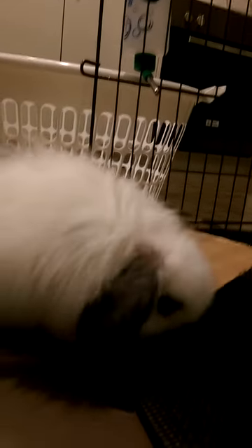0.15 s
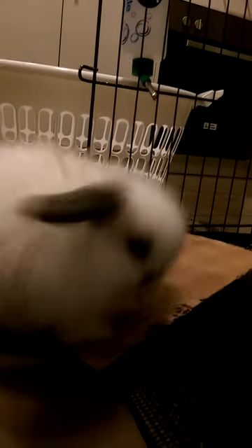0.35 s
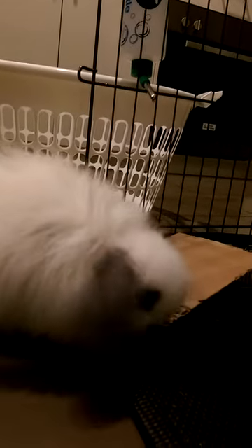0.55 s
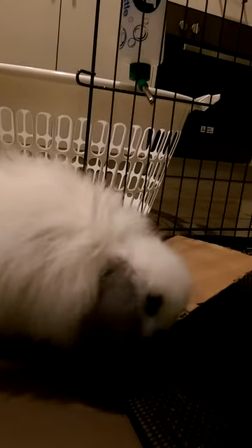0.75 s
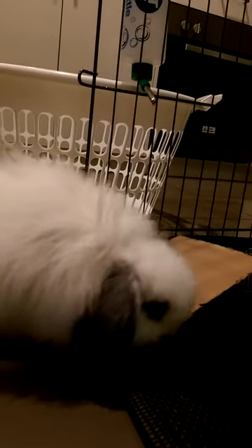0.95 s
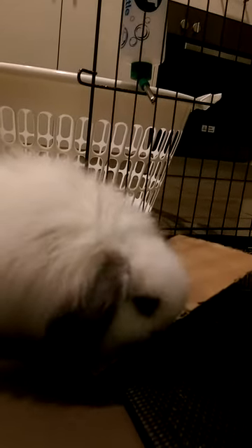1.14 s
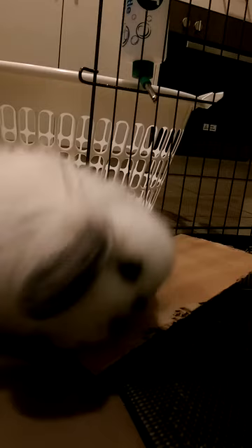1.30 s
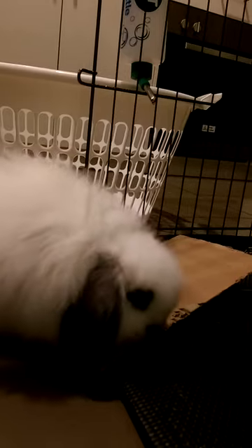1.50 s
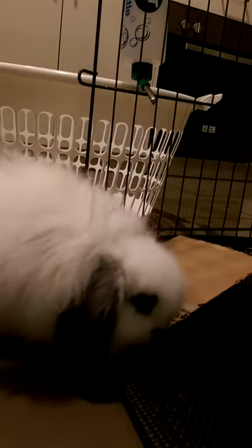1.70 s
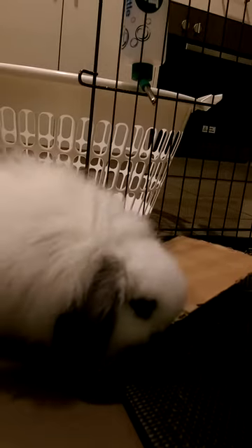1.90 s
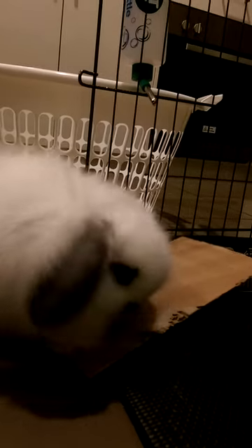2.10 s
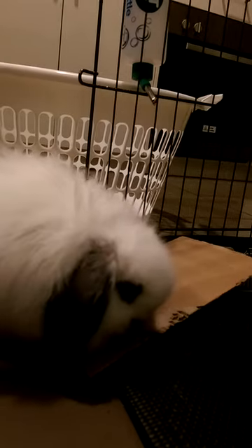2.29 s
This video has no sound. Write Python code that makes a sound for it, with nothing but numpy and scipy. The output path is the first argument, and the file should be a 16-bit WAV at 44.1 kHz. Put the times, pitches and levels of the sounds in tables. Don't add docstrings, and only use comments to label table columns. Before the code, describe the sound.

A rabbit bites cardboard close to a stereo microphone: faint fibre ticks, a sharp crack, a quiet gap, the hardest crunch, another pause, then a softer tearing bite; small hard room, barely audible fan hum.

```python
import sys
import numpy as np
from scipy import signal
from scipy.fft import rfft, irfft
from scipy.io import wavfile

SR = 44100
rng = np.random.default_rng(int(sys.argv[2]) if len(sys.argv) > 2 else 0)


def put_to_file(sound):
    columns = np.atleast_2d(sound).T
    safe = np.clip(columns, -1, 1)
    whole_steps = np.round(safe * 32767)
    wavfile.write(sys.argv[1], SR, whole_steps.astype(np.int16))


def gain_from_db(level_db):
    decades = np.asarray(level_db, float) / 20
    return 10 ** decades


N = 103635

# [t/s, length/s]
TEARS = [(.0705, .010), (.1118, .013), (.1265, .005), (.140, .009), (.2405, .002), (.2437, .003),
         (.37, .02), (.845, .006), (.857, .016), (.994, .009), (1.034, .008), (1.066, .008), (1.110, .011),
         (1.1245, .006), (1.212, .006), (1.2195, .004), (1.926, .032), (2.031, .006), (2.0365, .019),
         (2.0555, .006)]
# [body level/dB, flute ring level/dB, fibre fizz level/dB]
TEAR_FORCE_DB = [(-65, -63, -63.5), (-54.5, -49.5, -55), (-45, -37, -39), (-53.5, -43, -48.5),
                 (-35, -36, -39), (-27, -30, -41), (-82, -60, -60.5), (-56, -54, -68),
                 (-61.5, -59.5, -68.5), (-61, -62.5, -68.5), (-80, -65, -71), (-63, -67, -72),
                 (-47.5, -43, -53), (-46, -37, -40.5), (-49, -41, -51), (-29.5, -37, -36.5),
                 (-65, -57, -58), (-55, -40, -52.5), (-33, -31.5, -35), (-32, -32.5, -31)]
SNAPS_PER_S, SNAP_SPREAD_DB, RELEASE_S, TEAR_TOP_DB = 6000, 4, 0.0012, 3


def tears():
    when = (rng.random(N) < SNAPS_PER_S / SR) * rng.choice([-1., 1.], N)
    size = np.minimum(rng.exponential(1, (4, N)), 3)
    force = np.zeros((4, N))
    for (start_s, length_s), (body_db, ring_db, fizz_db) in zip(TEARS, TEAR_FORCE_DB):
        t = np.arange(0, length_s + 0.012, 1 / SR)
        at = round(start_s * SR)
        hold = np.exp(-np.maximum(t - length_s, 0) / RELEASE_S)
        levels_db = np.array([body_db, ring_db, fizz_db, fizz_db + TEAR_TOP_DB])
        force[:, at:at + len(t)] += gain_from_db(levels_db)[:, None] * hold
    return force * when * gain_from_db(SNAP_SPREAD_DB * size) * np.sqrt(SR / SNAPS_PER_S) / 2


# [t/s, body level/dB, flute ring level/dB, fibre fizz level/dB, top level/dB]
CRACKS = [(.037, -53, -45.5, -60, -62), (0.103, -55, -39, -39.5, -64), (0.126, -32, -29.5, -21.5, -32),
          (.2425, -19.5, -7.5, -10, -6.5), (.2432, -6, 0.5, -29, -30), (0.245, -11.5, -15, -15, -34),
          (.455, -71, -66.5, -59, -47), (0.9016, -58.5, -54, -51, -37.5), (1.047, -68, -53, -58, -43),
          (1.1097, -44, -37, -37, -30), (1.1216, -29, -22, -41, -26), (1.1241, -46, -16.5, -21, -29),
          (1.2189, -27, -15.5, -5, -41), (1.2189, -4.5, -7, -30, -35), (1.2225, -51, -17, -34, -60),
          (1.9887, -67, -56, -33.5, -64), (2.0302, -59, -48, -36, -50), (2.2786, -59, -66, -38.5, -53),
          (.0707, -65, -53.5, -51.5, -57.5), (.1122, -41, -32.5, -40, -41), (.1172, -44, -38, -48.5, -47.5),
          (.9945, -49, -58, -60.5, -71.5)]


def cracks():
    snaps = np.zeros((4, 3, N))
    for k, (s, *levels_db) in enumerate(CRACKS):
        snaps[:, k % 3, round(s * SR)] = 2 * gain_from_db(np.array(levels_db))
    return snaps


ONSET_CYCLES = 0.6


def ring(modes):
    t = np.arange(6000) / SR
    h = np.zeros(len(t))
    for hz, db, t60_s in modes:
        onset = np.minimum(t * hz / ONSET_CYCLES, 1)
        h += gain_from_db(db - 60 * t / t60_s) * np.sin(2 * np.pi * hz * t) * onset
    return h / np.linalg.norm(h)


# [t/s, level/dB]
THUMPS = [
    (.2431, -13.5),
    (1.2184, -7),
    (2.038, -15.5),
    (2.047, -24),
    (2.056, -22),
    (1.121, -35),
]
# [f/Hz, level/dB, t60/s]
SHEET_MODES = [(210, -5, 0.042), (309.4, 0.5, 0.0705), (346.6, -2, 0.083), (454.8, -1.5, .04),
               (545, -1.5, 0.082)]


def sheet_flex():
    push = np.zeros(N)
    for s, db in THUMPS:
        push[round(s * SR)] = 2 * gain_from_db(db)
    return signal.oaconvolve(push, ring(SHEET_MODES))[:N]


# [f/Hz, level/dB, t60/s]
BODY = [(887, -1, 0.013), (1020, 12, 0.0025), (1370, -6, 0.016), (1487, -8, 0.015), (1930, 2, 0.015)]
RING = [(3070, 1, 0.004), (3730, -0.56, 0.0048), (4210, -1, 0.0041)]
FIZZ = [(6050, -28, 0.012), (7100, 1, 0.0019), (8400, -4.5, 0.0019), (9660, -8.5, 0.0011)]
TOP = [(10650, 1, 0.0015), (14150, -3.1, 0.00088)]
# [low f/Hz, high f/Hz]
EDGES_HZ = [(600, 1850), (2200, 4870), (5400, 10600), (10600, 22000)]
KNOCK_DB, LINGER_DB = 3, 0


def cardboard():
    snaps = np.concatenate([cracks(), tears()[:, None]], axis=1)
    near, far = [], np.zeros((4, N))
    for x, modes, (low_hz, high_hz) in zip(snaps, (BODY, RING, FIZZ, TOP), EDGES_HZ):
        near.append(signal.oaconvolve(x.sum(0), ring(modes))[:N])
        band = signal.butter(4, (low_hz, high_hz), "bandpass", fs=SR, output="sos")
        far += signal.sosfilt(band, x) * np.sqrt(SR / 2 / (high_hz - low_hz))
    sheet = sheet_flex()
    far[0] += gain_from_db(LINGER_DB) * sheet
    return gain_from_db(KNOCK_DB) * near[0] + sum(near[1:]) + sheet, far


def read(points, hz):
    f, value = np.transpose(points)
    return np.interp(np.log(hz + 1), np.log(f + 1), value)


# [f/Hz, level/dB]
RIGHT_MIC = [(100, 3.5), (400, 0.5), (1300, 14), (2400, -0.5), (4400, -4.5), (8100, -12.5), (11000, -10),
             (15000, 2)]
RIGHT_LAG_S = 0.00022
EARLY_DB, EARLY_T60_S, EARLY_HZ = -6, 0.016, 1230


def microphones(x):
    hz, t = np.fft.rfftfreq(N, 1 / SR), np.arange(900) / SR
    early = rng.standard_normal((2, len(t))) * (rng.random((2, len(t))) < 0.03) * (t > 0.001)
    early *= gain_from_db(EARLY_DB - 60 * t / EARLY_T60_S)
    scatter = rfft(early, N) * 1j * hz / (EARLY_HZ + 1j * hz)
    tilt = gain_from_db(read(RIGHT_MIC, hz) / 2)
    ports = np.array([1 / tilt, tilt * np.exp(-2j * np.pi * hz * RIGHT_LAG_S)])
    ports = ports * (1j * hz / (200 + 1j * hz)) ** 2
    return irfft(rfft(x) * ports * (1 + scatter), N)


# [f/Hz, likeness/1]
ROOM_SAME = [(100, 0.88), (300, .85), (650, .05), (3000, .15), (7000, .02)]


def pair(samples, right, shape):
    hz = np.fft.rfftfreq(512, 1 / SR)[:, None]
    t = np.arange(samples // 128 + 6) * 128 / SR
    a, b, c, d = rng.standard_normal((len(t), len(hz), 4)).T
    same = np.clip(read(ROOM_SAME, hz), 0, 1)
    left, other = a + 1j * b, c + 1j * d
    mixed = same * left + np.sqrt(1 - same ** 2) * other
    tilt_db = read(right, hz) / 2
    z = np.array([left * gain_from_db(-tilt_db), mixed * gain_from_db(tilt_db)])
    return signal.istft(z * gain_from_db(shape(hz, t)), nperseg=512, noverlap=384)[1][:, :samples]


# [f/Hz, t60/s]
ROOM_T60 = [(150, 0.29), (400, 0.3), (1000, 0.35), (2000, 0.4), (4000, .36), (8000, 0.33), (14000, .3)]
# [f/Hz, level/dB]
ROOM_TONE = [(300, 1), (1000, 0.5), (1900, 4), (2400, -5), (3000, -1.5), (5500, -7.5), (8500, -0.5),
             (14000, -5)]
# [f/Hz, level/dB]
ROOM_RIGHT = [(200, 4.5), (1000, 2.5), (4400, 0), (8100, -13), (15000, -2)]
ROOM_DB, ROOM_RISE_S = -5, 0.0035


def room(feeds):
    def decay_db(hz, t):
        return read(ROOM_TONE, hz) - 60 * t / read(ROOM_T60, hz)

    out = 0
    for x in feeds:
        tail = pair(SR * 3 // 4, ROOM_RIGHT, decay_db)
        t = np.arange(tail.shape[1]) / SR
        tail = tail * (1 - np.exp(-(t / ROOM_RISE_S) ** 2))
        out = out + signal.fftconvolve(x[None], tail / np.linalg.norm(tail[0]), axes=1)[:, :N]
    return gain_from_db(ROOM_DB) * out


def evened(x):
    return x / np.sqrt(np.mean(x ** 2) + 1e-20)


# [f/Hz, level/dB per Hz]
AIR = [(25, 1), (45, 3), (200, -8), (500, -19), (1200, -21.5), (4000, -28), (10000, -28), (16000, -32)]
# [f/Hz, level/dB]
AIR_RIGHT = [(100, 3), (500, 5), (2000, -2.5), (5000, -2.5), (9000, -9.5), (15000, 5.5)]
AIR_DB = -55
# [f/Hz, width/Hz, level/dB]
DRONE = [(40, 13, -58.5), (81.1, 9, -63.5), (117, 22, -75), (156, 10, -69), (198, 10, -73), (340.8, 5, -77)]
# [f/Hz, level/dB]
MOTOR = [(241.5, -70), (495.5, -73)]


def hum():
    t = np.arange(N) / SR
    out = gain_from_db(AIR_DB - 4) * evened(pair(N, AIR_RIGHT, lambda hz, t: read(AIR, hz) + 0 * t))
    for hz, width_hz, db in DRONE:
        r = np.exp(-np.pi * width_hz / SR)
        slow = signal.lfilter([1], [1, -2 * r, r * r], rng.standard_normal((2, 2 * N)))[:, N:]
        phase = 2 * np.pi * hz * t
        out = out + gain_from_db(db) * evened(slow[0] * np.cos(phase) + slow[1] * np.sin(phase))
    for hz, db in MOTOR:
        out = out + gain_from_db(db) * np.sqrt(2) * np.sin(2 * np.pi * hz * t)
    return out


def scene():
    near, far = cardboard()
    return microphones(near) + room(far) + hum()


def roll_off(x):
    return signal.sosfilt(signal.butter(12, 16650, fs=SR, output="sos"), x)


def record(dry):
    bass_cut = signal.butter(4, 31, "highpass", fs=SR, output="sos")
    top_edge = signal.firwin(255, 15800, fs=SR)
    held = 1.008 * np.tanh(signal.sosfilt(bass_cut, dry) / 0.97)
    return roll_off(signal.oaconvolve(held, top_edge[None], "same"))


dry = scene()
out = record(dry)
put_to_file(out)
```